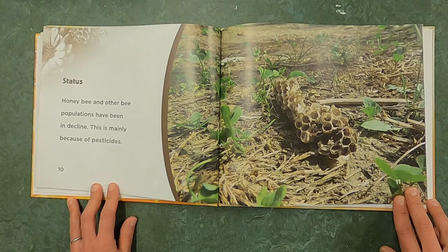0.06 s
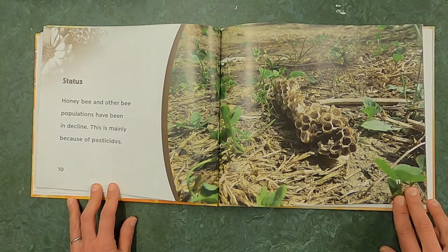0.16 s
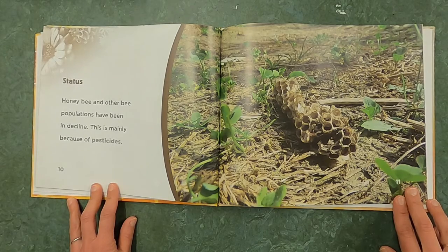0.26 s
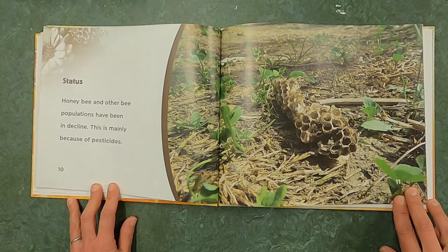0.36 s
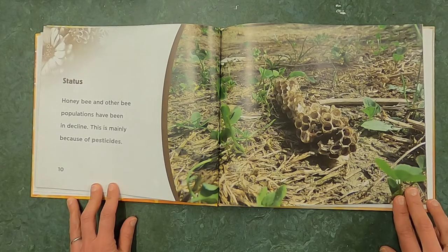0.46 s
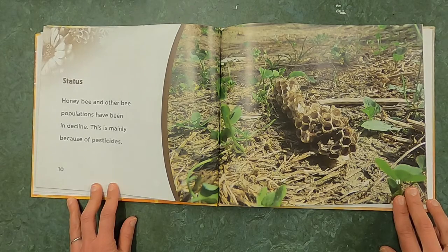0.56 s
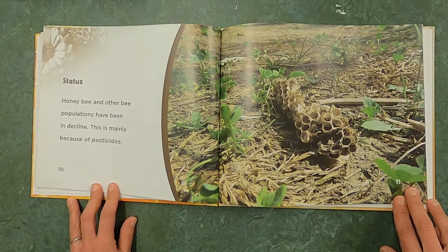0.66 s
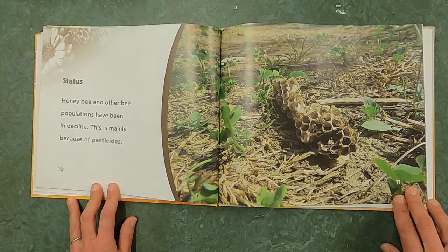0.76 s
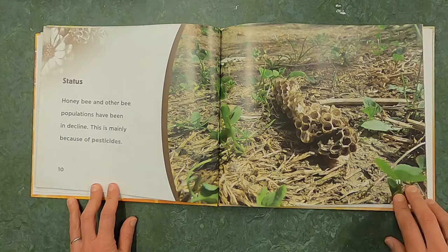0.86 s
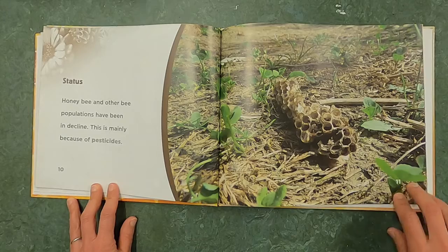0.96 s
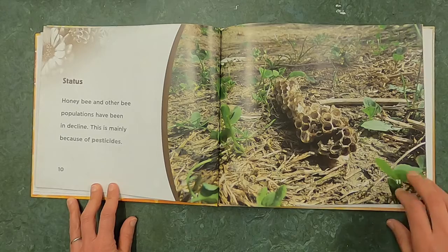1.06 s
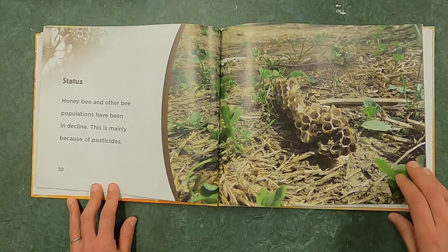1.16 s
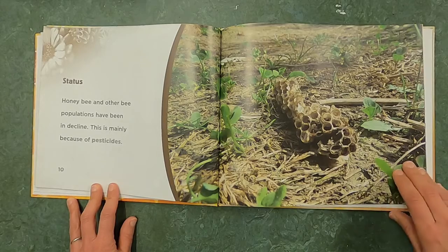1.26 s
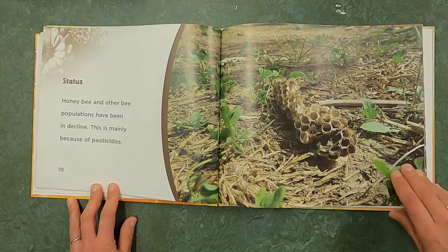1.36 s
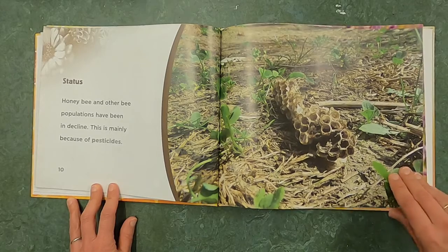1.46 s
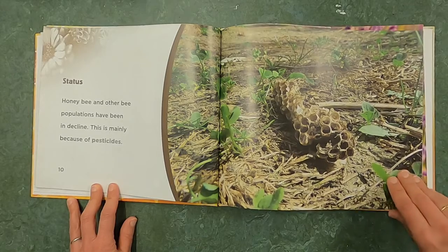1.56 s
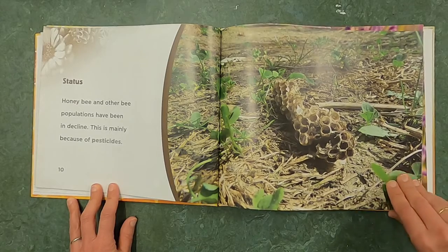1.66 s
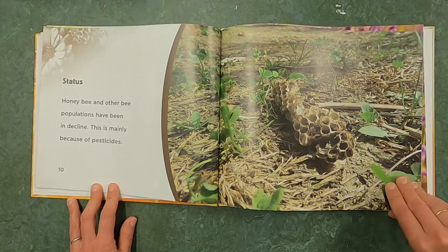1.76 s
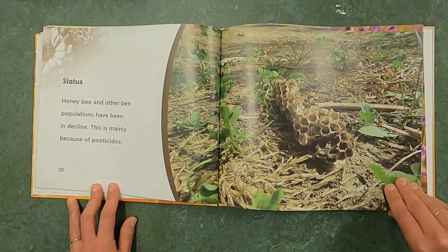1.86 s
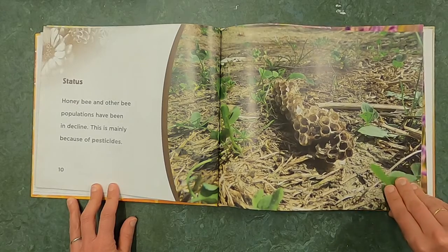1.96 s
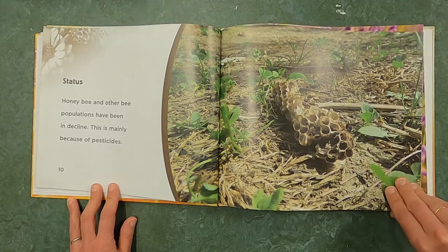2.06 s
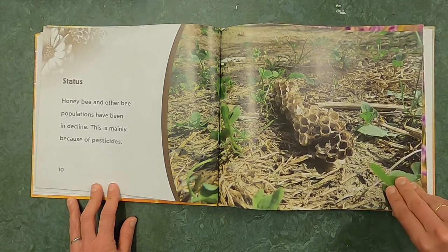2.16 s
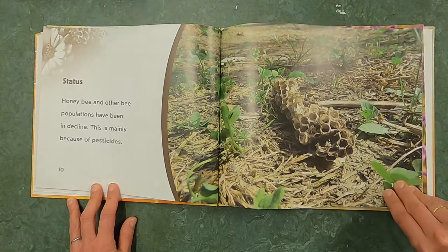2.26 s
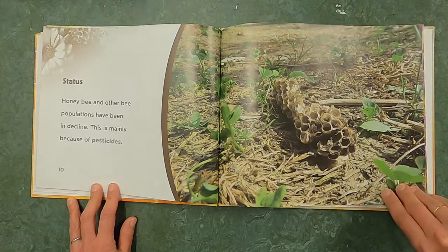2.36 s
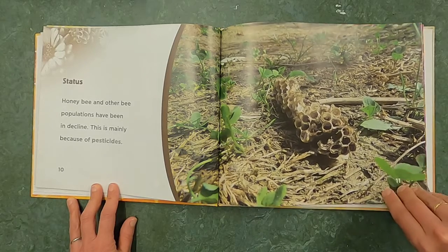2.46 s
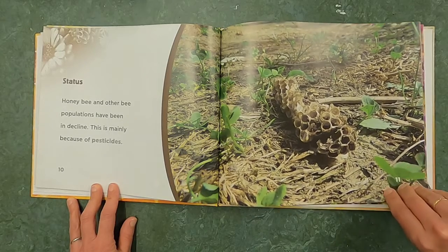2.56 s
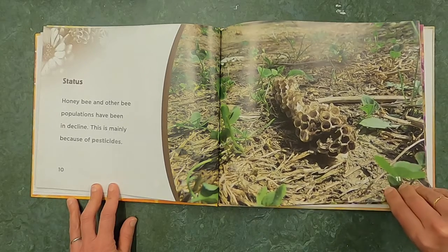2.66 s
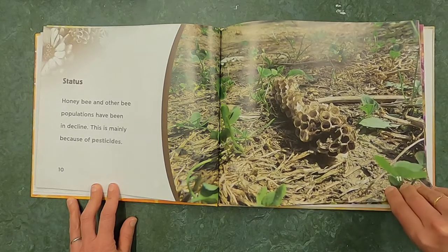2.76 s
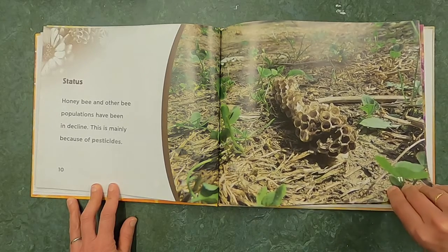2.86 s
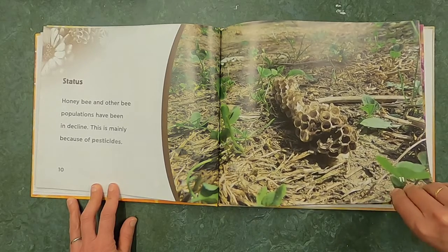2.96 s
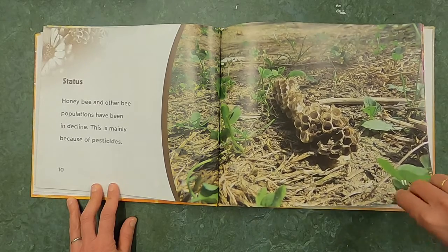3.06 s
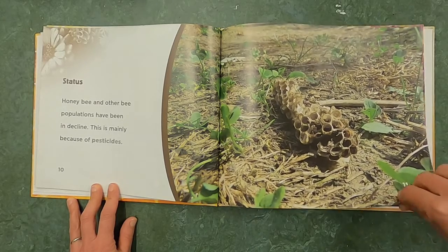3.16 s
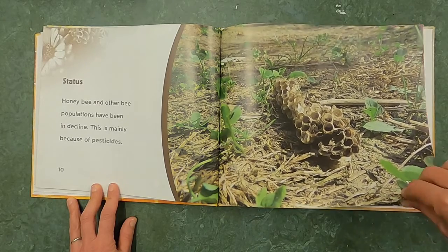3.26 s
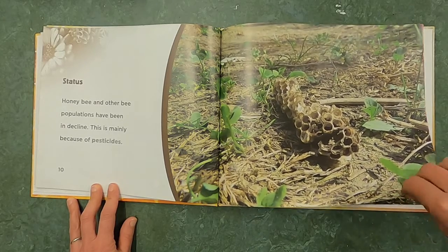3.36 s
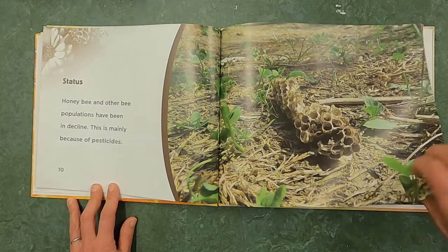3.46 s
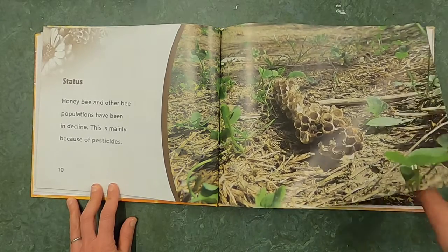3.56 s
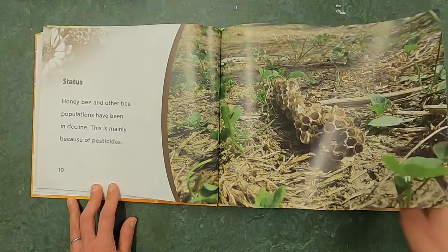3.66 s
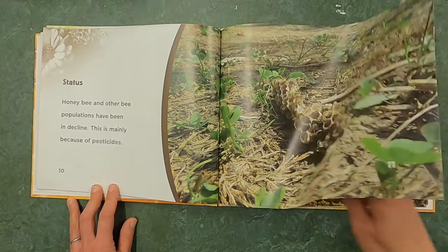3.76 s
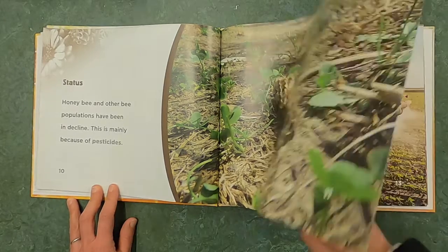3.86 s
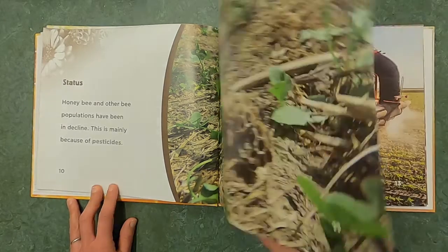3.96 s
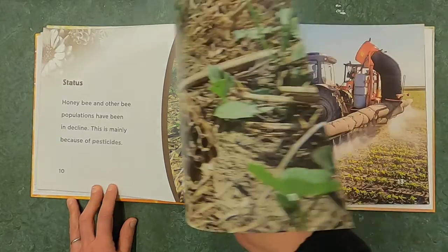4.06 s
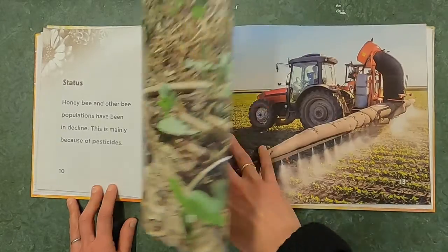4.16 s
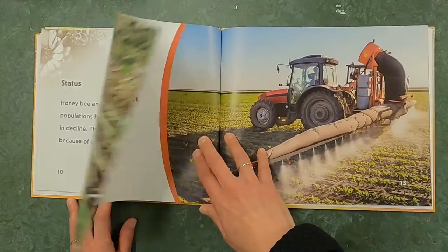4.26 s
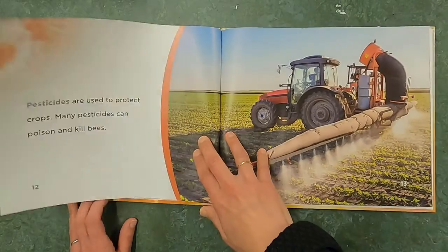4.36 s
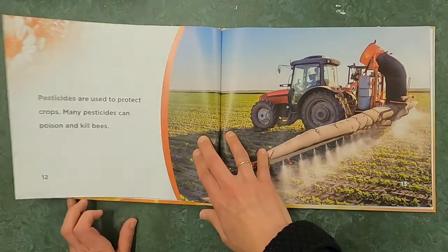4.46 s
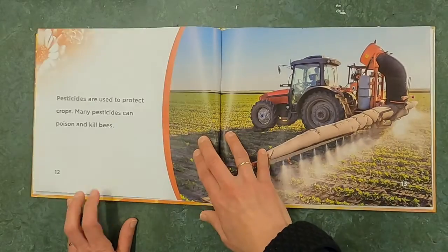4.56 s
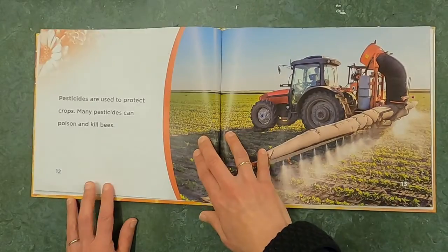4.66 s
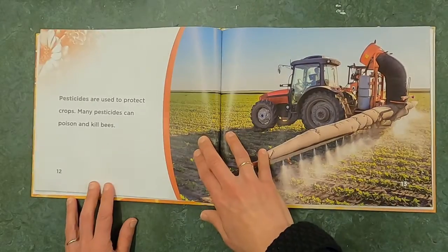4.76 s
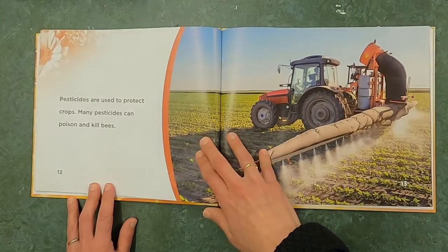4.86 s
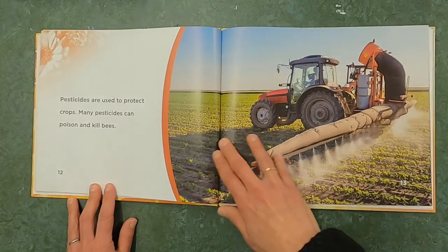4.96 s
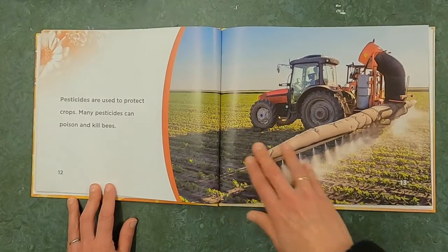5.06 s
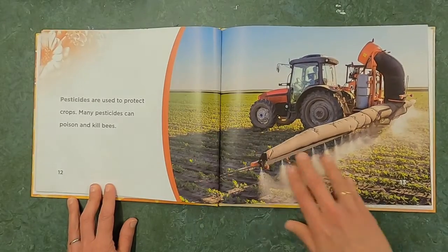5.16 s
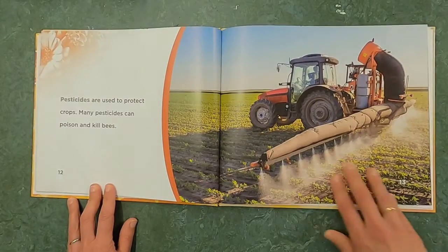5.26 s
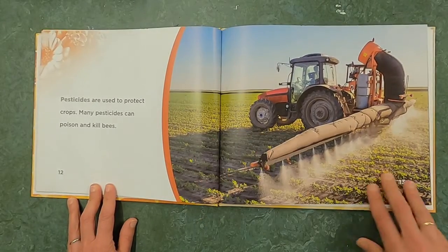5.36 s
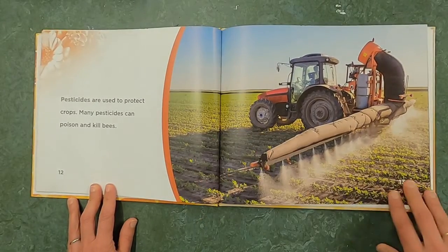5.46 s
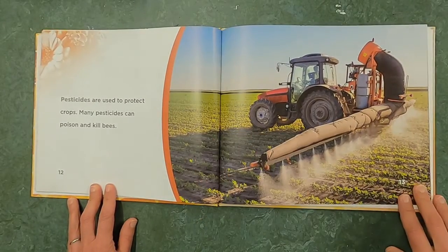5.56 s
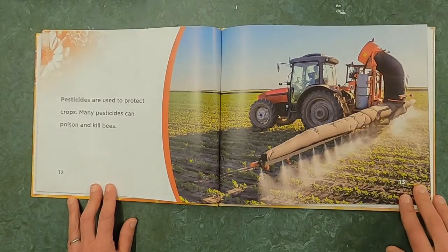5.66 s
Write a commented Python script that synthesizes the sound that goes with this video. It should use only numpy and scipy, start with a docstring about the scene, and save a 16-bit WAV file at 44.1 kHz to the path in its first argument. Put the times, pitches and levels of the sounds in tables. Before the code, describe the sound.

Close stereo microphone, indoors, constant deep throbbing hum and soft air rumble. Quiet skin-on-paper rubbing comes first, followed by crisp ticks and raspy scrapes as a page lifts. A light swish leads to a bright double snap of stiff paper, a hollow tap, then a gentle, even hand sweep and a last faint tap.

```python
"""A low throbbing ventilation hum (wavering sines) over moving air (coloured noise) runs throughout.
Fingers slide to the corner of a stiff, glossy page (grainy friction noise) and pick at it (filtered ticks).
The leaf drags off the one below, with short scrapes, and swings over as softer friction noise.
It buckles with a loud flap: decaying sines and noise ringing the sheet's bending modes.
It taps down on the stack (short sines with a crack); the palm then smooths it. A short room tail follows."""
import sys
import numpy as np
from scipy import signal
from scipy.fft import rfft, irfft, next_fast_len
from scipy.io import wavfile
from scipy.ndimage import uniform_filter1d, map_coordinates

SR = 44100
rng = np.random.default_rng(int(sys.argv[2]) if len(sys.argv) > 2 else 0)


def file_out(sig):
    """Save sig as 16-bit WAV at sys.argv[1]."""
    # one column per channel
    cols = np.atleast_2d(sig).T
    # limit, then scale
    lim = np.clip(cols, -1, 1)
    pcm = np.round(lim * 32767).astype(np.int16)
    wavfile.write(sys.argv[1], SR, pcm)


N = 251701


def amp(db):
    """Decibels to gain."""
    return 10 ** (np.asarray(db) / 20)


def unit(x):
    """Scale to rms 1."""
    return x / np.sqrt(np.mean(x ** 2) + 1e-20)


def along(points, hz):
    """(Hz, value) points read on a log frequency axis."""
    f, v = np.transpose(points)
    return np.interp(np.log(hz + 1), np.log(f + 1), v)


def wobble(knots_per_s):
    """A smooth random curve through normally distributed knots."""
    knots = rng.standard_normal(int(N * knots_per_s / SR) + 4)
    return map_coordinates(knots, [np.arange(N) * knots_per_s / SR])


def filtered(x, response):
    """x times a complex response of frequency."""
    n = x.shape[-1]
    m = next_fast_len(n + SR // 4)
    return irfft(rfft(x, m) * response(np.fft.rfftfreq(m, 1 / SR)), m)[..., :n]


def resonance(f, hz, width_hz):
    """Causal response of one damped mode."""
    return 1j * f * width_hz / (hz * hz - f * f + 1j * f * width_hz)


def add(track, start_s, sound):
    """Mix a sound into a track at a start time."""
    part = track[..., round(start_s * SR):][..., :sound.shape[-1]]
    part += sound[..., :part.shape[-1]]


def placed(pair, width, pan_db):
    """Left and right from a direct signal and its unrelated scatter; positive pan is to the left."""
    mid, side = pair[0], width * pair[1]
    return np.array([mid + side, mid - side]) * amp([[pan_db / 2], [-pan_db / 2]])


# Ventilation tones. Each row: frequency in Hz, relative level in dB.
TONES = [(33.8, -3.5), (58, -11)]
# Course of the tones' level. Each row: time in seconds, relative level in dB.
TONE_LEVEL = [(0, -37.5), (2.2, -40), (3.2, -35), (3.7, -45.5), (4.9, -43.5), (5.4, -35.5), (5.71, -40.5)]
# Spectrum of the moving air. Each row: frequency in Hz, relative density in dB.
AIR_COLOUR = [(10, -22), (20, -8), (42, -1), (66, -9.5), (85, -16), (110, -20.5), (140, -15.5),
              (250, -22.5), (500, -34.5), (850, -43.5), (1300, -41), (2200, -57), (4000, -67),
              (7400, -69.5), (9000, -85.5), (15000, -96.5)]
THROB_HZ, THROB_DB, THROB_CREST_S = 1.86, 3.5, 0.08  # slow beating: rate, depth either way, time of a crest


def ventilation():
    """Low throbbing tones, wavering in level and phase, over a steady rumble of moving air."""
    t = np.arange(N) / SR
    throb_db = THROB_DB * np.cos(2 * np.pi * THROB_HZ * (t - THROB_CREST_S))
    swell = amp(np.interp(t, *np.transpose(TONE_LEVEL)) + throb_db)
    hum = np.zeros(N)
    for hz, db in TONES:
        level = amp(db + 1.7 * wobble(8)) * np.sqrt(2)
        hum += level * np.sin(2 * np.pi * hz * t + 0.7 * wobble(4.1))
    hum *= swell
    noise = rng.standard_normal((2, N))
    air = amp(-42) * unit(filtered(noise, lambda f: amp(along(AIR_COLOUR, f))))
    # bass reaches both sides alike
    scatter = filtered(air[1], lambda f: along([(30, 0.08), (150, 0.15), (1500, 0.57)], f))
    end_fade = np.minimum(np.minimum(t, t[-1] - t) / 0.006, 1)
    return end_fade * placed([hum + air[0], scatter], width=0.99, pan_db=0.5)


SHOULDER_DB = 20  # depth one rise time before, or one fall time after, the hold


def gains(row):
    """One stroke: it speeds up, holds and slows down; one gain per sample for each dB column."""
    start_s, hold_s, rise_s, fall_s, *levels_db = row
    t = np.arange(N) / SR
    outside = np.maximum(np.maximum((start_s - t) / rise_s, (t - start_s - hold_s) / fall_s), 0)
    return [amp(db - SHOULDER_DB * np.minimum(outside, 3) ** 2) for db in levels_db]


def strokes(rows):
    """The gain columns of several strokes, joined in power on one time line."""
    return np.linalg.norm([gains(row) for row in rows], axis=0)


def friction(colour, grit, judder_db, patchy_db):
    """Countless tiny fibre slips of uneven size; the contact judders, and its ring shifts as it travels."""
    grains = rng.standard_normal((2, N)) * np.exp(grit * wobble(2500))
    z = signal.stft(grains, nperseg=512)[2]
    field = uniform_filter1d(rng.standard_normal(z.shape[1:]), size=3, axis=0)  # over frequency
    field = uniform_filter1d(field, size=14, axis=1)  # over time
    grains = signal.istft(z * amp(patchy_db * unit(field)), nperseg=512)[1][:, :N]
    rub = unit(filtered(grains, lambda f: amp(along(colour, f))))
    return rub * amp(judder_db * (wobble(70) + wobble(21.99)))


# Fingertips sliding on paper.
# Each row: start in seconds, hold in seconds, rise in seconds, fall in seconds, relative level in dB.
FINGER_STROKES = [(1.058, 0.0036, 0.025, 0.023, -73.5), (1.265, 0.013, 0.046, .025, -78.5),
                  (1.66, 0.068, .13, .06, -62), (1.79, .15, 0.05, 0.017, -67),
                  (1.985, 0.041, .02, 0.015, -62.5), (2.43, .01, 0.074, 0.052, -51),
                  (2.53, 0.0076, 0.087, 0.13, -51.5), (2.76, .11, .055, .07, -70),
                  (5.14, 0.033, .11, 0.028, -57)]
# Friction spectrum of skin on paper. Each row: frequency in Hz, relative density in dB.
SKIN_COLOUR = [(400, -18), (750, -3), (1050, -2), (1500, -4), (1950, -1.5), (2600, -9), (3500, 2.5),
               (4400, 1.5), (5500, -11), (7400, -7), (9000, -22.5), (13000, -36), (16000, -43.5)]
# Spectrum of the top sizzle. Each row: frequency in Hz, relative density in dB.
SIZZLE_COLOUR = [(7000, -22), (9500, -0.5), (13000, 1), (15500, -28.5)]


def fingers():
    """Skin rubs over paper; firmer strokes add proportionally more sizzle."""
    (press,) = strokes(FINGER_STROKES)
    rub = press * amp(1.6) * friction(SKIN_COLOUR, grit=0.23, judder_db=1.8, patchy_db=2.5)
    firm = press * np.sqrt(press / press.max())
    rub += firm * amp(-24) * friction(SIZZLE_COLOUR, grit=0.3, judder_db=1.1, patchy_db=6)
    return placed(rub, width=0.35, pan_db=-1)


FUMBLE_FROM_S, FUMBLE_TO_S = 1.35, 2.3
FUMBLE_DB, FUMBLE_HZ = -58, 3400  # middle of the spread: 2 dB and half an octave either way


def fumbles(count):
    """Rows of faint ticks at random moments while the fingers feel for the corner."""
    rows = []
    for u, v, w in rng.random((count, 3)):
        start_s = FUMBLE_FROM_S + u * (FUMBLE_TO_S - FUMBLE_FROM_S)
        rows.append((start_s, FUMBLE_DB + 4 * (v - 0.5), FUMBLE_HZ * 2 ** (w - 0.5)))
    return rows


# Small ticks of nail and paper edge. Each row: start in seconds, relative peak in dB, centre in Hz.
SMALL_TICKS = [(1.313, -54, 4660), (1.972, -39.5, 2560), (2.77, -35.5, 2150), (2.796, -30.5, 4200),
               (2.812, -34, 2900), (2.862, -38, 3140), (2.929, -42, 4300), (3.167, -30, 3000),
               (3.197, -30, 3150), (3.922, -22, 2580), (4.209, -40.5, 6470), (4.384, -30, 2670),
               (4.522, -28, 3130), (4.716, -47, 1706), (4.88, -44, 5960), (4.907, -52, 7020)]


def ticks():
    """A sharp contact and a faint shiver of the paper behind it; a lower centre gives a duller tick."""
    out, t = np.zeros((2, N)), np.arange(SR // 12) / SR
    for start_s, db, hz in SMALL_TICKS + fumbles(count=6):
        decay = amp(-60 * t / 0.0023) + amp(-11.5 - 60 * t / 0.043)  # contact, shiver
        burst = rng.standard_normal((2, len(t))) * decay
        soft = signal.butter(3, min(1.6 * hz, SR / 4), fs=SR, output="sos")
        tick = signal.sosfilt(soft, filtered(burst, lambda f: resonance(f, hz, 2.4 * hz)))
        add(out, start_s, amp(db - 4) * tick / np.abs(tick[0]).max())
    return placed(out, width=0.3, pan_db=-1.5)


# Brief scrapes of a finger or the page edge.
# Each row: peak time in seconds, relative level in dB, rise in seconds, fall in seconds, centre in Hz.
SCRAPES = [(1.79, -56.5, .008, .005, 3860), (2.53, -67, .05, 0.026, 1040), (3.057, -39.5, .003, .003, 3600),
           (3.2, -43.5, 0.0037, .012, 3100)]
# Bands of the leaf's corner flicking free of the stack. Each row: centre in Hz, relative level in dB.
FLICK_BANDS = [(800, -49), (2080, -35), (5150, -33.5), (8050, -49.5)]
FLICK_S, FLICK_RISE_S, FLICK_FALL_S = 3.404, 0.0038, 0.0054


def scrapes():
    """A finger or the page edge scrapes briefly: resonant noise swells and dies exponentially."""
    out, t = np.zeros((2, N)), np.arange(N) / SR
    flick = [(FLICK_S, db, FLICK_RISE_S, FLICK_FALL_S, hz) for hz, db in FLICK_BANDS]
    for peak_s, db, rise_s, fall_s, hz in SCRAPES + flick:
        def band(f):
            narrow, broad = resonance(f, hz, 0.13 * hz), resonance(f, hz, 2 * hz)
            return narrow * broad / (1 + (f / 11000) ** 4)
        scrape = unit(filtered(rng.standard_normal((2, N)), band))
        out += amp(db) * scrape * np.exp(-np.maximum((peak_s - t) / rise_s, (t - peak_s) / fall_s))
    return placed(out, width=0.4, pan_db=-2.9)


# Tugs that drag the lifted leaf over the next one. Each row: start in seconds, hold in seconds,
# rise in seconds, fall in seconds, relative rasp level in dB, relative hiss level in dB.
DRAG_TUGS = [(2.933, 0.023, 0.018, .03, -59, -65), (2.985, 0.066, 0.036, 0.035, -49, -58.5),
             (3.12, .015, 0.044, 0.054, -50, -63.5), (3.2, 0.055, 0.047, 0.12, -46.5, -54.5),
             (3.405, .004, 0.037, 0.059, -62, -62.5), (3.495, 0.0041, .036, 0.039, -51, -65),
             (3.576, 0.062, 0.021, 0.034, -51.5, -60), (3.675, .045, .04, .03, -58.5, -65)]
# The cut edge of the leaf catching coarsely on the stack.
# Each row: start in seconds, hold in seconds, rise in seconds, fall in seconds, relative level in dB.
EDGE_CATCHES = [(3.205, 0.06, 0.033, 0.13, -46), (3.495, .006, 0.036, .04, -53)]
# Spectra of rasp, hiss and coarse catch. Each row: frequency in Hz, relative density in dB.
RASP_COLOUR = [(500, -15), (1000, -13), (1600, -7), (2000, -9.5), (2400, -6), (2850, -2), (3100, -4),
               (3500, -1.5), (4200, -1), (4900, -7.5), (5600, -16.5), (9000, -40.5)]
HISS_COLOUR = [(2500, -32.5), (4300, -1), (5200, -0.5), (6100, -2), (7400, -2), (9000, -13), (13000, -28.5),
               (15500, -42.5)]
COARSE_COLOUR = [(600, -41), (1100, -13), (1550, -3), (1900, -7), (2150, 4), (2850, -0.5), (3700, -2.5),
                 (4600, -33), (7000, -38.5)]


def dragging():
    """Leaf rubs on leaf in tugs: a mid rasp, a higher hiss and the coarse grind of the cut edge."""
    rasp, hiss = strokes(DRAG_TUGS)
    (catch,) = strokes(EDGE_CATCHES)
    drag = rasp * amp(1.14) * friction(RASP_COLOUR, grit=0.39, judder_db=1.46, patchy_db=3)
    drag += hiss * amp(1.7) * friction(HISS_COLOUR, grit=0.25, judder_db=2.8, patchy_db=4)
    drag += catch * amp(-2) * friction(COARSE_COLOUR, grit=0.3, judder_db=0.1, patchy_db=2)
    return placed(drag, width=0.35, pan_db=-3)


# The leaf swinging over, then sliding past the left hand.
# Each row: start in seconds, hold in seconds, rise in seconds, fall in seconds, relative level in dB.
SWING_STROKES = [(3.78, .06, 0.06, 0.11, -66), (3.93, 0.18, .11, 0.051, -59), (4.21, 0.12, .01, .18, -65.5),
                 (4.49, .03, 0.064, .03, -67), (4.524, 0.042, .012, 0.044, -60.5)]
# Spectrum of the swish. Each row: frequency in Hz, relative density in dB.
SWISH_COLOUR = [(300, -14.5), (700, -3), (1100, -2), (1750, -3), (2400, -6), (3100, -3), (4300, -8),
                (5400, -11.5), (7100, -11.5), (8600, -21.5), (10500, -26), (13000, -31), (15000, -48)]


def swinging():
    """The moving leaf swishes: friction noise weighted to the middle range."""
    (swing,) = strokes(SWING_STROKES)
    leaf = swing * amp(8) * friction(SWISH_COLOUR, grit=0.26, judder_db=1.44, patchy_db=2.5)
    return placed(leaf, width=0.3, pan_db=-0.91)


# Bending resonances of the sheet. Each row: frequency in Hz, width in Hz, relative level in dB.
SHEET_MODES = [(285, 110, -9.5), (783, 76, -2), (945, 84, 1), (1230, 140, 1.5), (1550, 210, 1),
               (1880, 230, -1.5), (2350, 270, -7), (3160, 750, -13)]


def sheet(f):
    """Response of the leaf's bending resonances, alternating in sign."""
    return sum((-1) ** k * amp(db) * resonance(f, hz, width_hz)
               for k, (hz, width_hz, db) in enumerate(SHEET_MODES))


# Runs of small pops as a crease travels through the sheet.
# Each row: start in seconds, hold in seconds, rise in seconds, fall in seconds, relative level in dB.
CREASE_RUNS = [(3.941, 0.0066, .004, .012, -35.5), (4.011, .003, .003, .016, -38),
               (4.157, 0.023, .01, 0.025, -23), (4.21, .021, .02, .028, -31.5)]
POPS_PER_S, POP_SCATTER_DB, CRUMPLE_EDGE_HZ = 2800, 3, 4030
BELLY_HZ, BELLY_WIDTH_HZ, BELLY_DB = 220, 380, -22.5  # the whole leaf heaving, relative to the ring


def crumples():
    """A travelling crease sheds small pops at random; each rings the sheet and gives it a soft low push."""
    (effort,) = strokes(CREASE_RUNS)
    pops = (rng.random((2, N)) < POPS_PER_S / SR) * np.sign(rng.standard_normal((2, N)))
    pops = pops * amp(POP_SCATTER_DB * rng.standard_normal((2, N)))

    def bright_sheet(f):
        return sheet(f) * np.sqrt(1 + f / 3000) / np.sqrt(1 + (f / CRUMPLE_EDGE_HZ) ** 8)
    ring = unit(filtered(pops, bright_sheet))
    belly = unit(filtered(pops, lambda f: resonance(f, BELLY_HZ, BELLY_WIDTH_HZ) ** 2))
    return placed(effort * (ring + amp(BELLY_DB) * belly), width=0.27, pan_db=-1.8)


def pop(t, hz, t60_s, attack_s):
    """A few cycles of a patch of paper snapping through, peak 1."""
    wave = np.sin(2 * np.pi * hz * t) * amp(-60 * t / t60_s) * (1 - np.exp(-(t / attack_s) ** 2))
    return wave / np.abs(wave).max()


# The bent sheet buckling. Each row: start in seconds, relative peak in dB, pop frequency in Hz,
# t60 of the pop in seconds, ring relative to that peak in dB.
SHEET_BUCKLES = [(3.944, -20, 2560, 0.0017, -11.5), (4.008, -20.5, 815, .014, -7),
                 (4.154, -6.5, 1250, .013, -14.5), (4.173, -9, 1805, 0.0056, -11),
                 (4.180, -11, 1304, 0.0079, -9), (4.2183, -2.5, 2100, 0.0023, -15.5)]


def buckles():
    """Each buckle pops once, then bending waves rattle unevenly around the sheet; the low ones last longest."""
    out, t = np.zeros((2, N)), np.arange(SR // 4) / SR
    for start_s, db, hz, t60_s, ring_db in SHEET_BUCKLES:
        crackle = rng.standard_normal((2, len(t))) * np.exp(0.5 * wobble(900)[:len(t)])
        rattle = unit(filtered(crackle, lambda f: sheet(f) / np.sqrt(1 + (f / 4200) ** 8)))
        flutter = unit(filtered(crackle, lambda f: sheet(f) / (1 + (f / 2200) ** 3)))
        ring = rattle * amp(-60 * t / 0.034) + flutter * amp(-17.5 - 60 * t / 0.29)
        add(out, start_s, amp(db + ring_db) * ring * (1 - np.exp(-t / 0.00049)))
        add(out[0], start_s, amp(db - 3.5) * pop(t, hz, t60_s, attack_s=0.09 * t60_s))
    return placed(out, width=0.17, pan_db=-1.3)


# Hollow taps of the page against the stack.
# Each row: start in seconds, relative peak in dB, pitch in Hz, t60 of the pop in seconds.
PAGE_TAPS = [(4.591, -21.5, 854, 0.014), (4.838, -57, 2560, 0.013), (5.142, -42.5, 836, .025),
             (5.173, -46, 2760, 0.013), (5.665, -40, 1870, 0.013)]


def taps():
    """The page slaps shut on a thin cushion of air, with a slight papery crack."""
    out, t = np.zeros((2, N)), np.arange(SR // 12) / SR
    for start_s, db, hz, t60_s in PAGE_TAPS:
        decay = amp(-60 * t / 0.025) + amp(-13 - 60 * t / 0.13)
        burst = rng.standard_normal((2, len(t))) * decay
        crack = filtered(burst, lambda f: resonance(f, hz, 1.36 * hz) ** 2 / (1 + 1j * f / 4500) ** 2)
        add(out, start_s, amp(db - 6.5) * crack / np.abs(crack[0]).max())
        add(out[0], start_s, amp(db) * pop(t, hz, t60_s, attack_s=0.0012))
    return placed(out, width=0.23, pan_db=0.4)


# The palm smoothing the new page.
# Each row: start in seconds, hold in seconds, rise in seconds, fall in seconds, relative level in dB.
PALM_STROKES = [(5.16, 0.37, 0.092, 0.3, -57.5)]
# Spectrum of the sweep. Each row: frequency in Hz, relative density in dB.
SWEEP_COLOUR = [(500, -20), (800, -8.5), (1250, 0.5), (1650, -6), (2000, -2.5), (2500, -5), (3400, -2.5),
                (4400, 1.5), (6200, -7.5), (7500, 1.5), (8400, -6), (12500, -14.5), (14000, -19),
                (15500, -32)]


def palm():
    """The palm sweeps over the page: broad, even friction noise."""
    (press,) = strokes(PALM_STROKES)
    sweep = press * amp(1) * friction(SWEEP_COLOUR, grit=0.23, judder_db=0.9, patchy_db=0.5)
    return placed(sweep, width=0.3, pan_db=-1.4)


# Decay of the room. Each row: frequency in Hz, t60 in seconds.
ROOM_T60 = [(200, 0.37), (1500, 0.15), (5000, 0.15), (12000, 0.058)]


def room(x):
    """A short noise tail in which the treble dies first."""
    hz, t, z = signal.stft(rng.standard_normal((2, SR // 2)), SR, nperseg=256)
    decay = amp(-60 * t / along(ROOM_T60, hz)[:, None])
    tail = signal.istft(z * decay, SR, nperseg=256)[1]
    return signal.fftconvolve(x, tail / np.linalg.norm(tail[0]), axes=1)[:, :N]


# Share of the left-right difference that is kept. Each row: frequency in Hz, share.
SIDE_SHARE = [(200, .5), (1200, .7), (4500, 0.96), (7000, .6)]
# Phase by which the right side leads. Each row: frequency in Hz, phase in radians.
RIGHT_LEAD = [(60, 0.2), (800, 0.098), (1800, 0.52), (3200, 0.7), (5500, 1.57), (6400, 0.97), (10000, 0)]


def scene():
    """The book lies close by, slightly to the right, in a room with ventilation."""
    air = ventilation()
    rubbing = fingers() + dragging() + swinging() + palm()
    left, right = rubbing + ticks() + scrapes() + crumples() + buckles() + taps()
    mid = (left + right) / 2
    side = filtered((left - right) / 2, lambda f: along(SIDE_SHARE, f))
    sides = np.array([mid + side, mid - side])
    half_turn = np.array([[-0.5j], [0.5j]])  # half the lead on each side
    book = filtered(sides, lambda f: np.exp(half_turn * along(RIGHT_LEAD, f)))
    return book + amp(-17) * room(book) + air


TOP_HZ = 15300


def record(dry):
    """Nothing passes above the band limit."""
    return filtered(dry, lambda f: f < TOP_HZ)


dry = scene()
out = record(dry)
file_out(out)
```